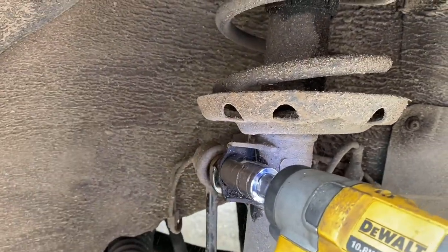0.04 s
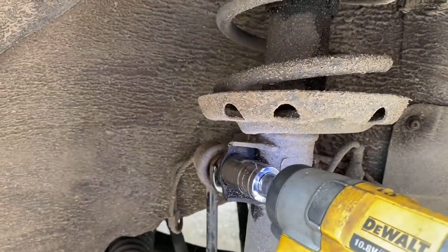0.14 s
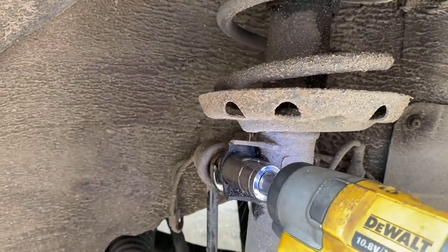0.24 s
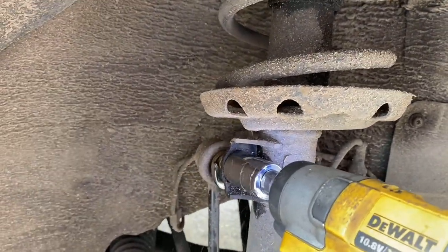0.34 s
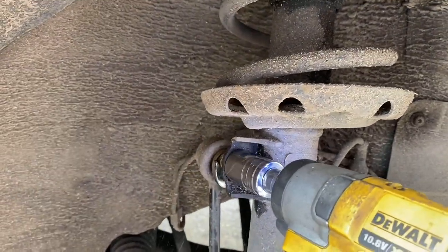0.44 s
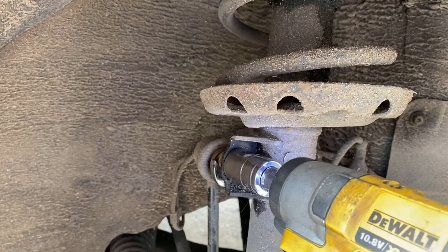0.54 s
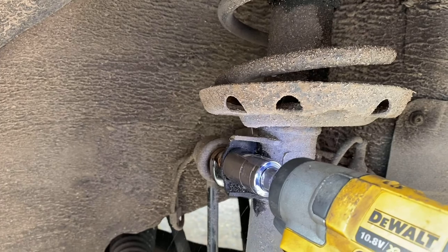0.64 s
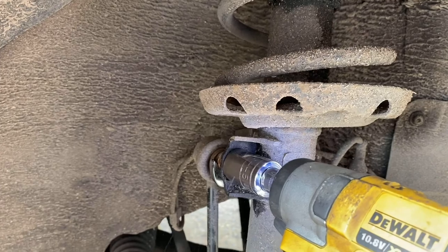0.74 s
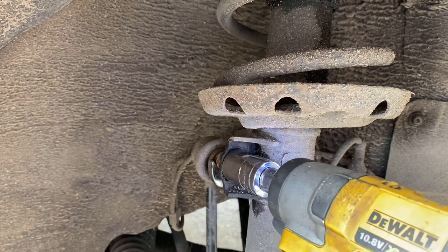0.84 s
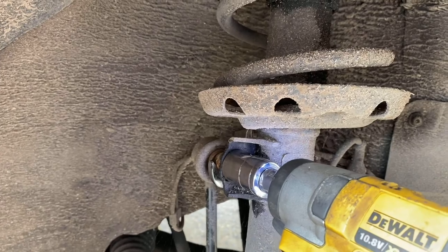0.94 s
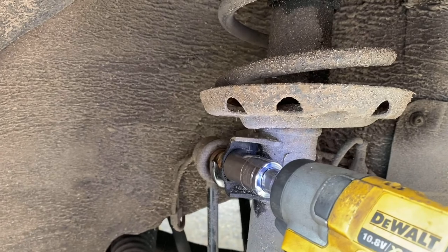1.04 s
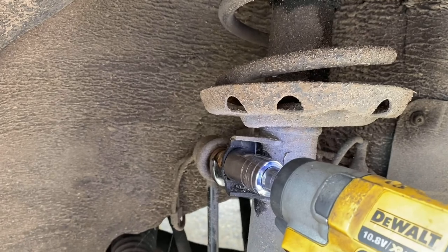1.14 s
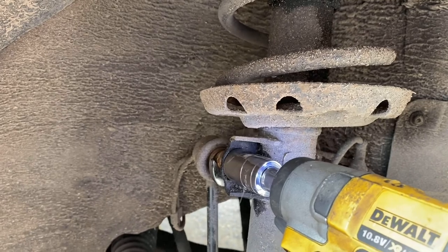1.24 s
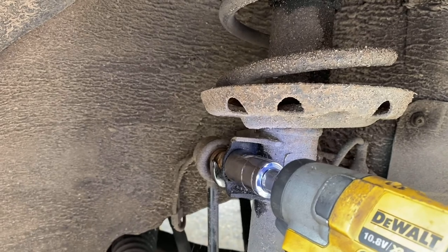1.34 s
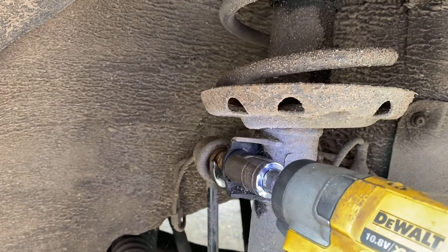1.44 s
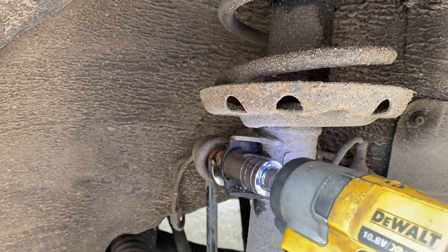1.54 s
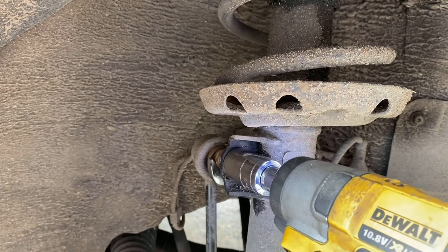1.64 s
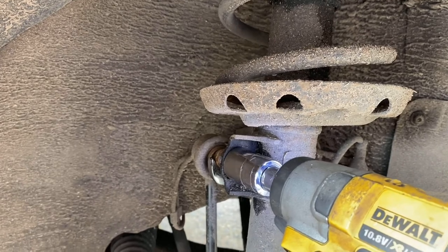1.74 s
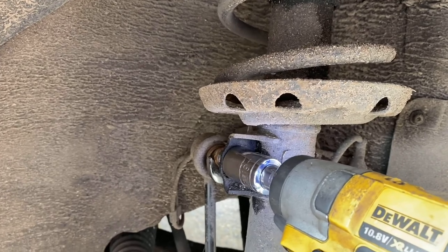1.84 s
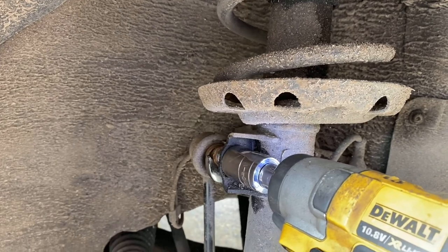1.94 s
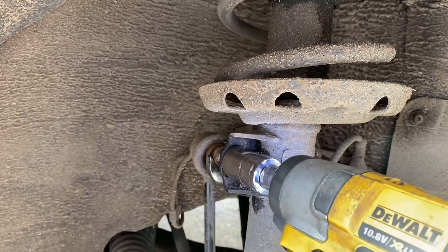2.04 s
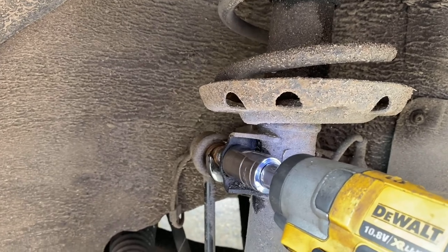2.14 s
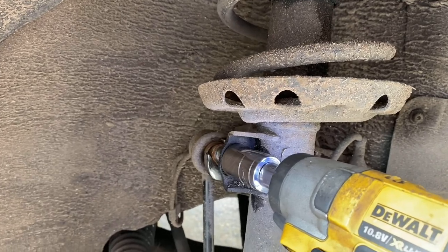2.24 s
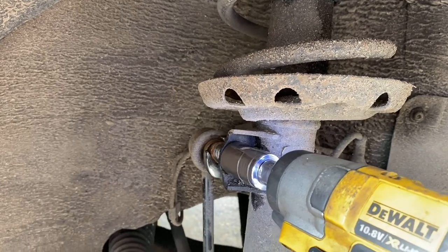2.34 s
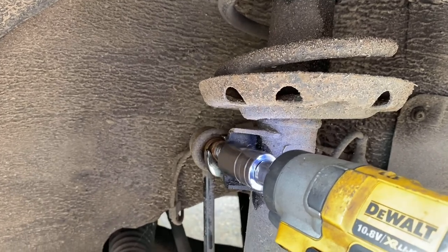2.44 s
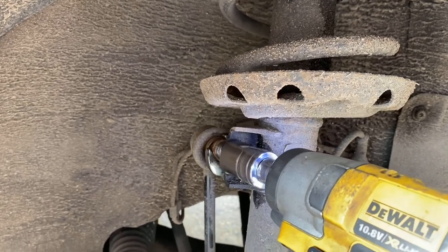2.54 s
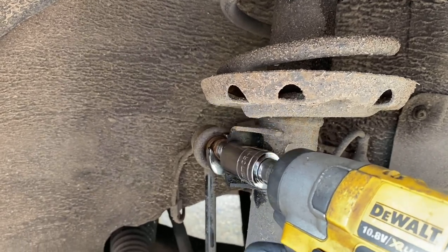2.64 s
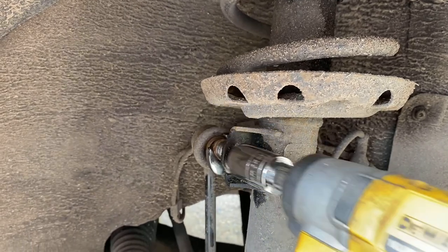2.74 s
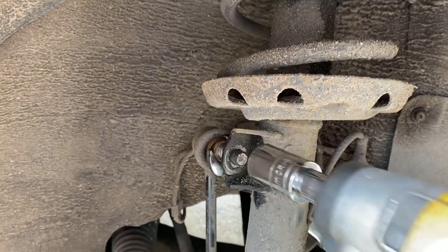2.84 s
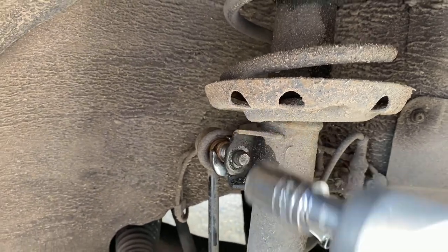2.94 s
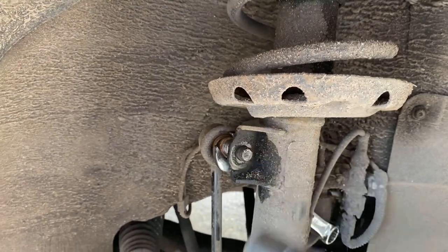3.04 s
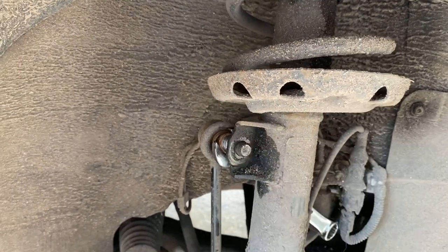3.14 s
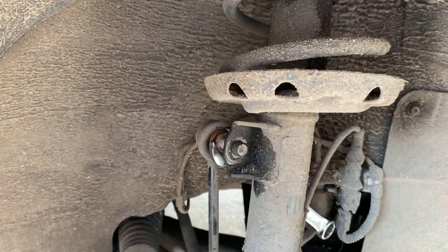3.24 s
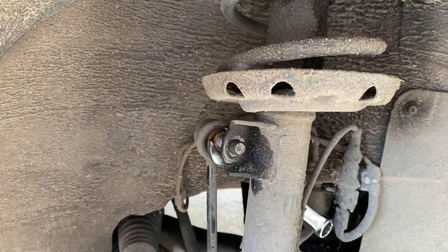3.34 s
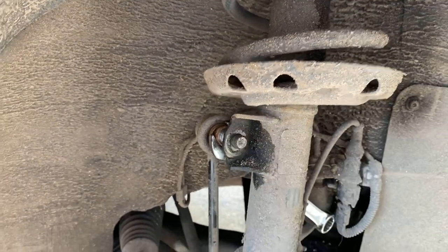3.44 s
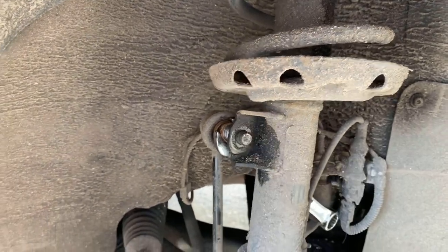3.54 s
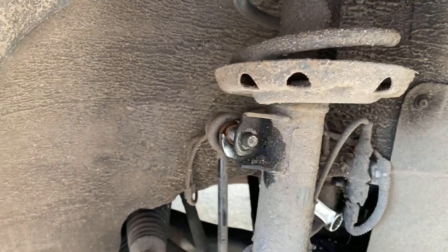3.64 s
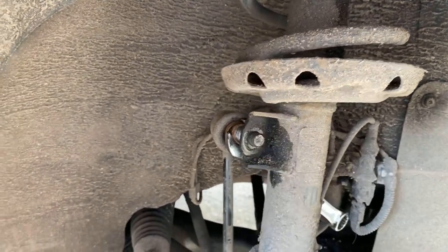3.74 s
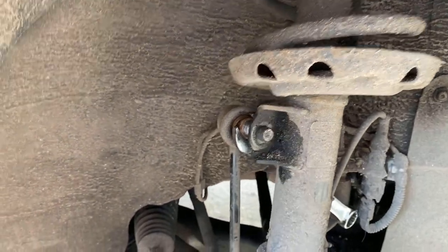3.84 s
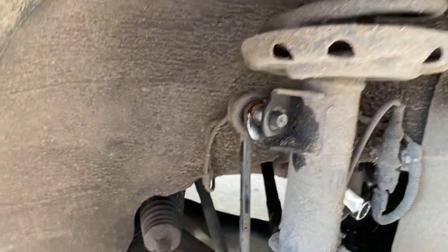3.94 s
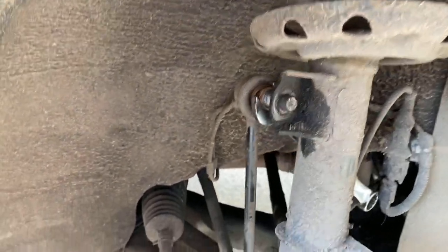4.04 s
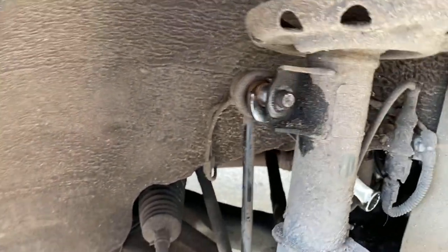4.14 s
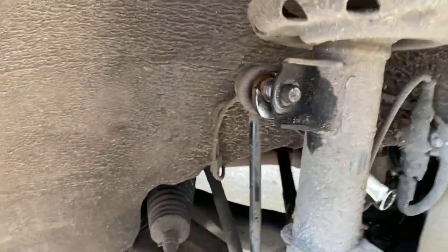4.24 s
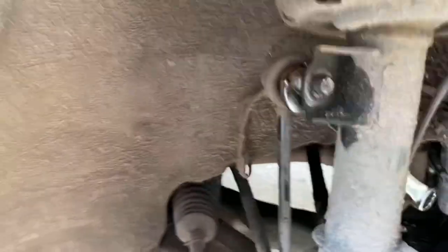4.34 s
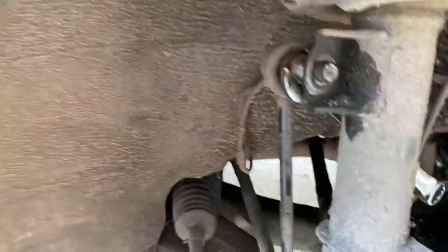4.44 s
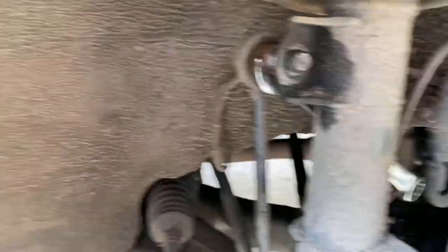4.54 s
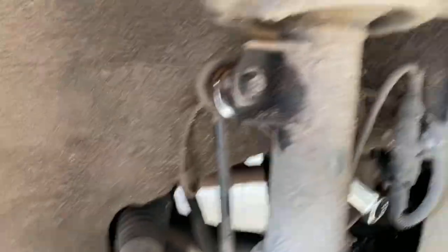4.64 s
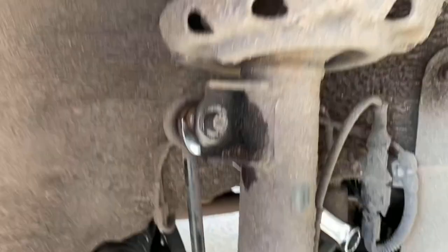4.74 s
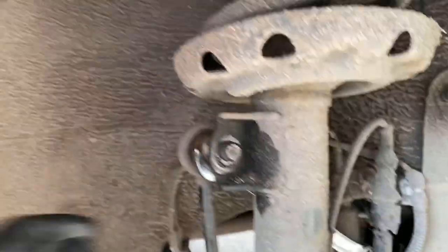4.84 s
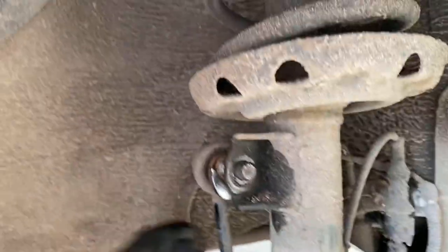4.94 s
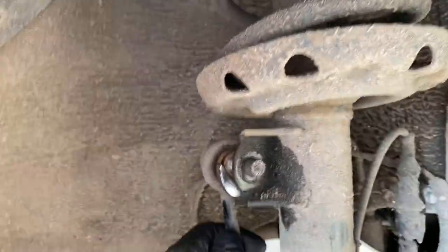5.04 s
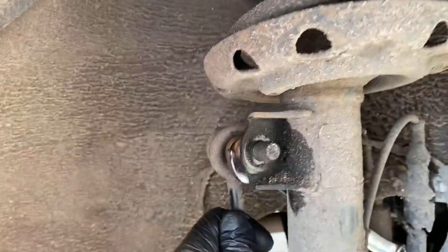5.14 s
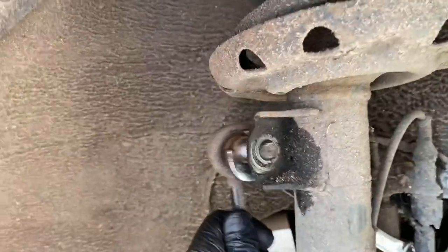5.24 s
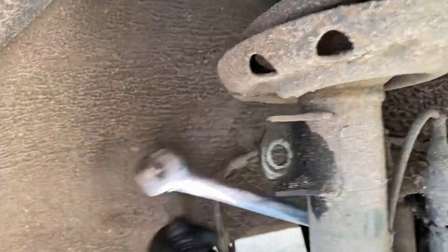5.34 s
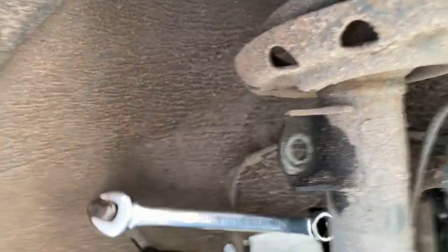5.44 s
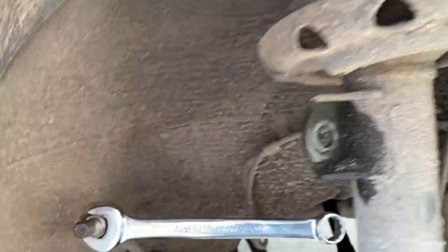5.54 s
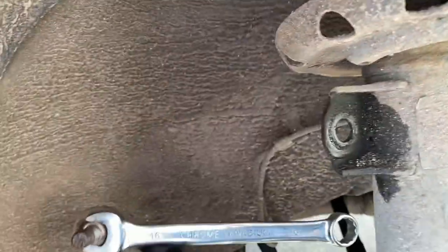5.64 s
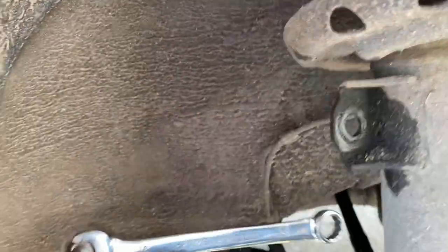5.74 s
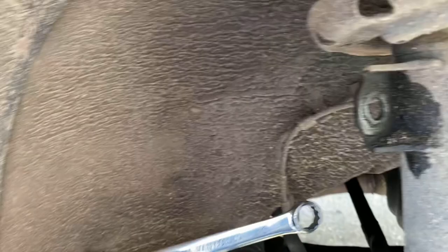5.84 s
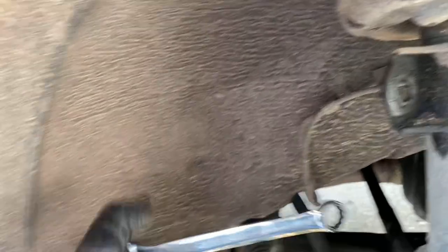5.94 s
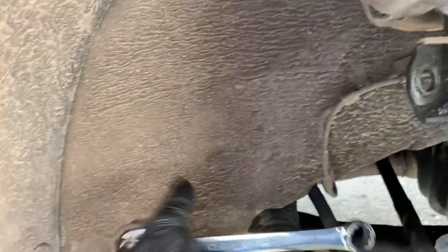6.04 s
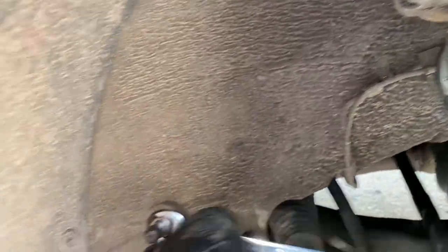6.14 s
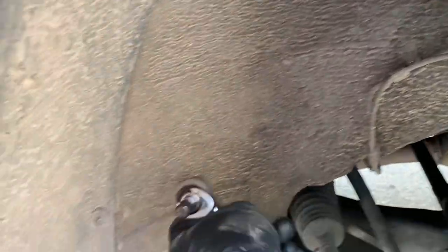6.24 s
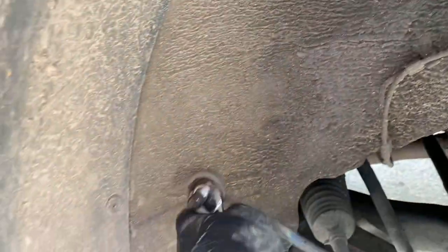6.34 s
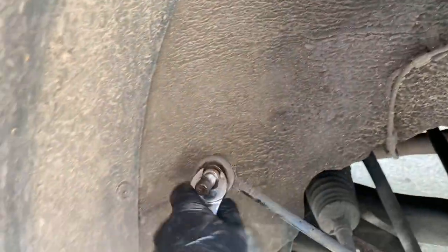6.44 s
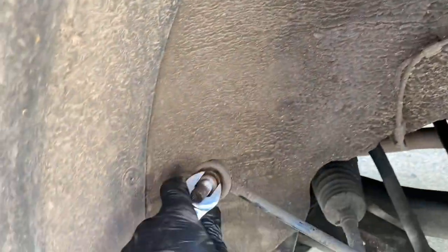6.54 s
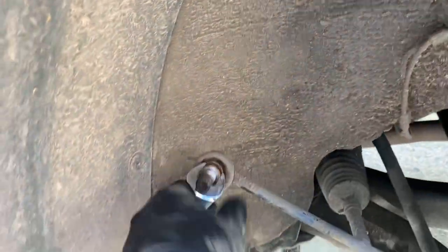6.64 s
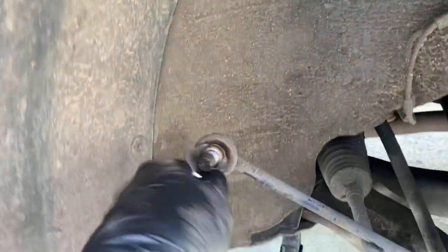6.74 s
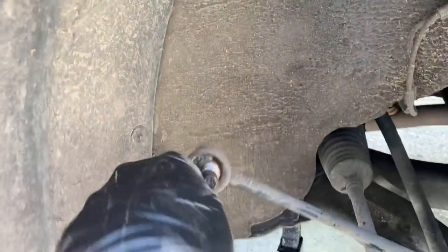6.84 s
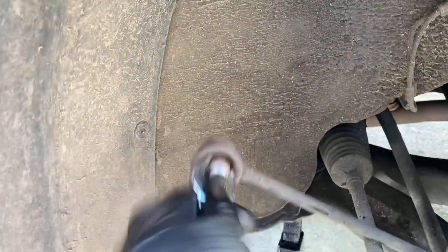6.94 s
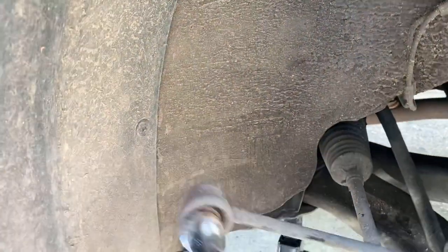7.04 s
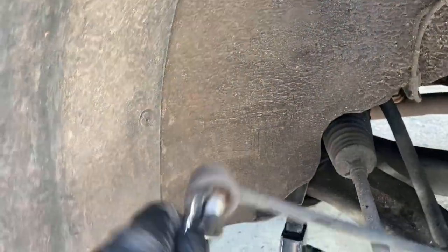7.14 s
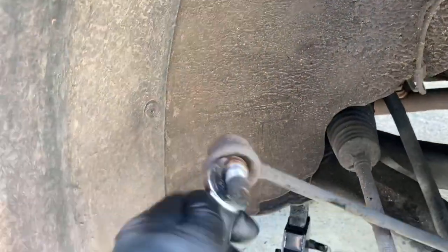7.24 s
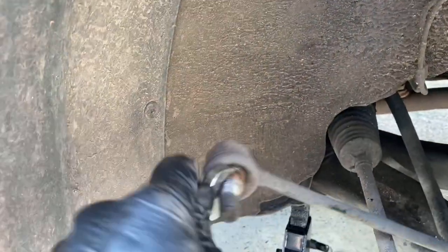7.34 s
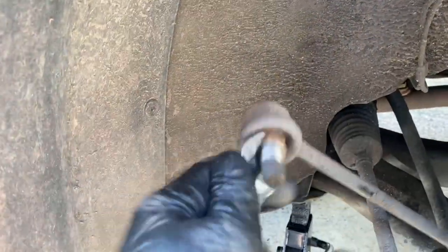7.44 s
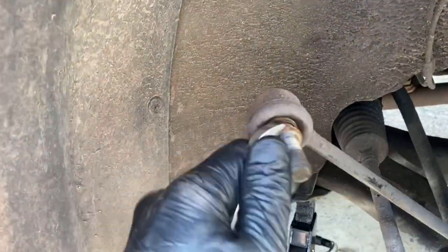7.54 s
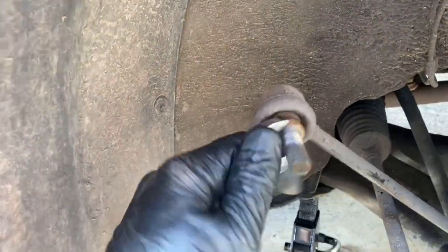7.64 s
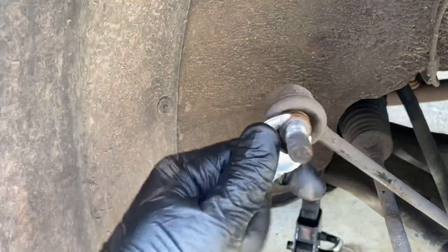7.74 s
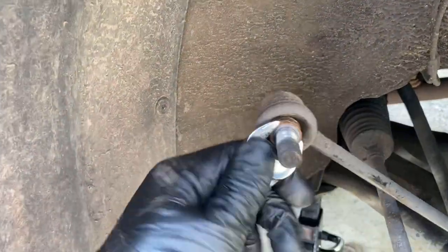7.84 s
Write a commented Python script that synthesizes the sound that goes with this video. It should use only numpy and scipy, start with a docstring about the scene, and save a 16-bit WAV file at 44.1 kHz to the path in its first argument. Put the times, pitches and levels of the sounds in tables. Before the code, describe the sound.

Close up under a car's wheel arch, a cordless impact wrench hammers a nut at about fifty hard steel blows a second, slows, whirs free and stops with a thin clack. The tool is put down with sharp plastic-metal knocks, then a spanner and link tap and scrape. The handheld microphone rumbles over faint traffic and a distant rev.

```python
"""A cordless impact wrench hammers about fifty times a second on a rusty nut at a car's strut, slows, spins
free and stops; then the tool is put down, a spanner and a steel link knock and scrape in a gloved hand,
the hand-held camera rumbles, and far off an engine revs over faint street noise.
Blows and contacts are noise bursts ringing steel resonances; thumps are falling sweeps; motor, rumble,
rustle and traffic are shaped noise; whine, shaft and engine are sine orders of a turning rate."""
import sys
import numpy as np
from scipy import signal
from scipy.fft import rfft, irfft, next_fast_len
from scipy.io import wavfile
from scipy.ndimage import uniform_filter1d, map_coordinates

SR = 44100
rng = np.random.default_rng(int(sys.argv[2]) if len(sys.argv) > 2 else 0)


def convert_level_to_amplitude(level_db):
    """Map a level in decibels to its linear amplitude factor."""
    exponent = np.asarray(level_db, float) / 20
    return 10 ** exponent


def store_pcm(level_fs):
    """Save levels as 16-bit WAV."""
    pcm = np.round(np.clip(level_fs, -1, 1) * 32767).astype(np.int16)
    wavfile.write(sys.argv[1], SR, np.atleast_2d(pcm).T)


N = 347508


def unit(x):
    """Normalisation: scale to rms 1."""
    return x / np.sqrt(np.mean(x ** 2) + 1e-20)


def along(points, hz):
    """Interpolation of (frequency, value) points on a logarithmic frequency axis."""
    f, value = np.transpose(points)
    return np.interp(np.log(hz + 1), np.log(f + 1), value)


def curves(rows):
    """Linear interpolation in time: one value per sample for each column after the time."""
    s, *columns = np.transpose(rows)
    return [np.interp(np.arange(N) / SR, s, column) for column in columns]


def wobble(rate):
    """Random modulation: a smooth curve through `rate` random knots a second."""
    knots = rng.standard_normal(int(N * rate / SR) + 4)
    return map_coordinates(knots, [np.arange(N) * rate / SR])


def filtered(x, response):
    """Linear filtering: the spectrum of x times a complex response of frequency."""
    m = next_fast_len(x.shape[-1] + 4096)
    spectrum = rfft(x, m) * response(np.fft.rfftfreq(m, 1 / SR))
    return irfft(spectrum, m)[..., :x.shape[-1]]


def ringing(modes, hz, flip=-1):
    """Modal superposition of causal resonances; neighbours swing opposite ways if flip is negative."""
    total = 0
    for k, (centre, width, db) in enumerate(modes):
        damping = 1j * hz * width
        total = total + flip ** k * convert_level_to_amplitude(db) * damping / (centre * centre - hz * hz + damping)
    return total


def ports(pair, alike):
    """Stereo coherence: two independent signals, as mid and side, give the wanted left-right likeness."""
    def weights(hz):
        turn = np.arccos(np.clip(along(alike, hz), -1, 1)) / 2
        return np.array([np.cos(turn), np.sin(turn)])

    mid, side = filtered(pair, weights)
    return np.array([mid + side, mid - side])


def rush(response, alike):
    """Spectrally shaped random noise in stereo, of rms 1."""
    return unit(ports(filtered(rng.standard_normal((2, N)), response), alike))


def add(track, s, sound):
    """Superposition: mix a sound in at time s."""
    start = round(s * SR)
    sound = sound[..., max(-start, 0):]
    part = track[..., max(start, 0):][..., :sound.shape[-1]]
    part += sound[..., :part.shape[-1]]


# Diffuse field of street and hand: [f/Hz, left-right likeness]
DIFFUSE_LIKENESS = [(60, 1), (300, 0.21), (640, 0.083), (3000, 0.14)]
# Traffic course: [t/s, level/dB]
TRAFFIC_LEVEL = [(2.6, -83), (4.3, -80), (4.7, -77.5), (6.9, -76.5), (7.88, -71.5)]
# Traffic spectrum: [f/Hz, relative level/dB]
TRAFFIC_SPECTRUM = [(71, -34.5), (120, -6), (236, -9.5), (400, -13.5), (658, -17.5), (1430, -19),
                    (2010, -26), (4000, -41.5), (5200, -53)]
# Revving far engine: [t/s, firing rate f/Hz, third-order level/dB]
ENGINE_REV = [(4.6, 66, -105), (4.801, 71.7, -80), (4.998, 73.7, -75.5), (5.249, 80, -71.5),
              (5.45, 82.1, -71), (5.65, 78.1, -83), (5.95, 74.2, -79.5)]
# Engine orders: [multiple of the firing rate, relative level/dB]
ENGINE_ORDER_LEVELS = [(2, -4), (3, 0), (4, -9), (5, -8)]
# Faint narrow bands: [start t/s, end t/s, start f/Hz, end f/Hz, half-width f/Hz, level/dB]
FAINT_BANDS = [(4.9, 5.806, 397, 397, 30, -74), (7.05, 7.948, 393, 393, 25, -73),
               (7.54, 7.625, 4310, 4240, 45, -90), (7.655, 7.755, 7500, 7300, 550, -70.5),
               (7.66, 7.76, 6200, 6500, 450, -76), (7.7, 7.95, 1580, 1330, 50, -72)]
# Faint bands, thin in the field: [f/Hz, left-right likeness]
FAINT_LIKENESS = [(60, .2)]


def street():
    """Diffuse noise and harmonic orders: far traffic, a revving engine and faint narrow noise bands."""
    traffic_db, = curves(TRAFFIC_LEVEL)
    traffic = rush(lambda f: convert_level_to_amplitude(along(TRAFFIC_SPECTRUM, f)), DIFFUSE_LIKENESS)
    out = convert_level_to_amplitude(traffic_db + 1.0 + 1.2 * wobble(6.2)) * traffic

    fade_in = (4.4, ENGINE_REV[0][1], -110)
    fade_out = (6.1, ENGINE_REV[-1][1], -110)
    rate_hz, engine_db = curves([fade_in, *ENGINE_REV, fade_out])
    turn = 2 * np.pi * np.cumsum(rate_hz) / SR
    for order, order_db in ENGINE_ORDER_LEVELS:
        # each order wavers on its own, and its phase differs between the ports
        level = np.sqrt(2) * convert_level_to_amplitude(engine_db + order_db + 1.5 * wobble(19.0))
        out += level * np.sin(order * turn + rng.normal(0, 0.32, (2, 1)))

    t = np.arange(N) / SR
    for start, end, hz, end_hz, width_hz, level_db in FAINT_BANDS:
        gone = np.clip((t - start) / (end - start), 0, 1)
        swell = np.sin(np.pi * gone) ** .7 * convert_level_to_amplitude(2.5 * wobble(45))
        glide = 2 * np.pi * np.cumsum(hz + (end_hz - hz) * gone) / SR
        # slow noise on a sine and a cosine makes a narrow band around the pitch
        for wave in (np.sin, np.cos):
            slow_noise = rush(lambda f: np.exp(-(f / width_hz) ** 2), FAINT_LIKENESS)
            out += convert_level_to_amplitude(level_db) * swell * slow_noise * wave(glide)
    return out


# Steady rumble of the held camera: [t/s, level/dB]
GRIP_LEVEL = [(2.2, -100), (2.6, -72.5), (3.7, -69.5), (4.29, -79.5), (4.73, -68.5), (5.6, -67.5),
              (6.2, -62.5), (7.2, -68.5), (7.88, -67.5)]
# The camera is shifted: [t/s, level/dB, rise/(dB per s), fall/(dB per s)]
CAMERA_SHOVES = [(2.939, -55, 158, 83.5), (4.81, -68.5, 700, 400), (5.48, -58, 502, 253),
                 (6.241, -51, 700.5, 69), (6.499, -61, 105.5, 123), (6.79, -48.5, 200, 148),
                 (6.95, -54, 132, 58)]
# Rumble spectrum: [f/Hz, relative level/dB]
RUMBLE_SPECTRUM = [(15, -41), (25, -16), (49, 0), (76, 2.5), (135, -8), (300, -21), (400, -58)]
# Glove and sleeve course: [t/s, level/dB]
RUSTLE_LEVEL = [(2.2, -107), (2.94, -95), (3.2, -81.5), (3.7, -92.5), (3.76, -80), (4.29, -89.5),
                (5.44, -85), (5.6, -77.5), (6.23, -81), (6.48, -102), (6.78, -84), (7.63, -82.5),
                (7.88, -75)]
# Rustle spectrum: [f/Hz, relative level/dB]
RUSTLE_SPECTRUM = [(1060, -35.5), (1800, -12.5), (3480, -7.5), (7030, -6), (11500, -11.5)]


def hand():
    """Structure-borne and friction noise: lumpy rumble of the camera body, grainy rustle of glove and sleeve."""
    (grip_db,), (rustle_db,), t = curves(GRIP_LEVEL), curves(RUSTLE_LEVEL), np.arange(N) / SR
    level = convert_level_to_amplitude(grip_db)
    for s, db, rise, fall in CAMERA_SHOVES:
        level = level + convert_level_to_amplitude(db - np.maximum((s - t) * rise, (t - s) * fall))
    rumble = rush(lambda f: convert_level_to_amplitude(along(RUMBLE_SPECTRUM, f)), DIFFUSE_LIKENESS)
    rumble = unit(convert_level_to_amplitude(3 * wobble(27)) * rumble)
    rustle = rush(lambda f: convert_level_to_amplitude(along(RUSTLE_SPECTRUM, f)), DIFFUSE_LIKENESS)
    rustle = unit(convert_level_to_amplitude(2.7 * wobble(44) + 1.2 * wobble(380)) * rustle)
    return level * rumble + convert_level_to_amplitude(rustle_db) * rustle


# Near sources (contacts and wrench): [f/Hz, left-right likeness]
NEAR_LIKENESS = [(60, .93), (250, .92), (500, .76), (1000, .6), (2000, .85), (4000, .5), (8000, .9)]
# Where the hands are: [t/s, left-right level/dB]
HAND_PLACE = [(2.5, 4), (3.8, 3.5), (4.1, -1), (4.6, 6.5), (5.1, 0.5), (5.9, 1.5), (7.9, -3.5)]
# Resonances of the tool's shell: [f/Hz, width f/Hz, level/dB]
TOOL_SHELL = [(2150, 200, -2), (2934, 120, 3), (3570, 150, 1), (4400, 200, 1)]
# Resonances of the tool's plastic case: [f/Hz, width f/Hz, level/dB]
TOOL_CASE = [(300, 120, -4), (745, 80, 4), (1190, 130, 1), (1480, 130, 2), (1900, 110, 0)]
# Spanner resonances: [f/Hz, width f/Hz, level/dB]
SPANNER_MODES = [(2940, 90, -5), (3430, 95, 4), (4168, 70, 4), (4928, 70, 3), (5710, 110, -1),
                 (6150, 120, 4), (7160, 80, 1)]
# Steel link resonances: [f/Hz, width f/Hz, level/dB]
LINK_MODES = [(640, 80, -2), (900, 60, 6), (1120, 110, -4), (1410, 90, -2), (1540, 70, -1), (2080, 90, -3),
              (2700, 130, 1)]
# Wheel-arch panel resonances: [f/Hz, width f/Hz, level/dB]
PANEL_MODES = [(183, 71, 0.5), (258, 107, 2), (425, 270, -5)]


def contact(track, s, push, slow_push, thud_db, edge_db, ring_hz):
    """Modal excitation: a push rings dull parts near ring_hz and a bright edge; the panel booms for longer."""
    tool_down_s = 3.95  # contacts before this are the tool being laid down
    # the edge dulls above top_hz
    if s < tool_down_s:
        top_hz, bright, dull = 15000, TOOL_SHELL, TOOL_CASE
    else:
        top_hz, bright, dull = 7250, SPANNER_MODES, LINK_MODES
    # each contact lands on another spot and wakes the modes differently, by 2 dB
    bright, dull = [[(c, w, g + 2 * rng.standard_normal()) for c, w, g in part] for part in (bright, dull)]
    # a soft contact wakes few modes, a hard one many
    spread = np.interp(edge_db, [-30, 0], [.2, .55])

    def edge(f):
        band = 1 / (1 + (2100 / (f + 1)) ** 4) / (1 + (f / top_hz) ** 3)
        return convert_level_to_amplitude(edge_db - 10.5) * band * (0.56 + 3 * ringing(bright, f, flip=0.96))

    def body(f):
        focus = 1 / (1 + (np.log((f + 1) / ring_hz) / spread) ** 2)
        return (ringing(dull, f) + 0.32) * 1.07 / np.sqrt(spread) * focus

    def thud(f):
        return convert_level_to_amplitude(thud_db + 9.5) * ringing(PANEL_MODES, f) / (1 + (f / 600) ** 4)

    sound = filtered(push, lambda f: edge(f) + body(f)) + filtered(slow_push, thud)
    pan_db = np.interp(s, *np.transpose(HAND_PLACE))
    add(track, s, convert_level_to_amplitude([[pan_db / 2], [-pan_db / 2]]) * ports(sound, NEAR_LIKENESS))


# Small contacts: [t/s, level/dB, relative thud level/dB, relative edge level/dB, strongest ring f/Hz]
KNOCK_EVENTS = [(3.283, -61, -18, -4, 1130), (3.337, -61, -20, 1, 2222), (3.702, -31, -17, 1, 1240),
                (3.781, -25, -40, -5.5, 1010), (3.785, -38, -42, -10, 900), (3.859, -50.5, -17, -2, 1610),
                (3.886, -54, -6.5, -1, 1260), (4.026, -58, -22, -10, 2000), (4.051, -44.5, -13, -12, 646),
                (4.065, -53, -19, -13, 596), (4.154, -57, -26, -2, 713), (4.358, -63, -24, -4, 2400),
                (4.6131, -45.5, -20.5, 4, 4300), (4.64, -46, -15, 7.5, 2400), (5.035, -56.5, -2, 2, 899),
                (5.074, -48.5, -4, -22, 1000), (5.208, -47.5, -21, 18.5, 1490), (5.228, -52, -2, -9, 1540),
                (5.239, -54, -7, -3, 1520), (5.847, -49.5, 3, -31, 864), (6.236, -43, -3.5, -13, 1200),
                (6.527, -52, -1, -32.5, 900), (6.578, -55.5, -2, -18, 2630), (6.609, -54.5, -7, -8, 2680),
                (6.74, -58, -4, -22, 890), (6.753, -48, -5, -9, 2840), (6.949, -61.5, -4, -1, 1010),
                (6.997, -41, -3, -26, 935), (7.387, -56.5, -14, -19, 2600), (7.5, -68.5, 9, 6, 690),
                (7.634, -64, 1, -19, 2760), (7.779, -59.5, 7.5, -23, 500), (7.806, -61, -5, -25, 1500),
                (7.816, -43, -12, -27, 1400)]
# Steel dragged on steel:
# [start t/s, loudest t/s, end t/s, level/dB, relative thud level/dB, relative edge level/dB]
SCRAPE_EVENTS = [(3.749, 3.757, 3.768, -48, -40, -1), (4.57, 4.604, 4.62, -70.5, 8, 0),
                 (5.051, 5.077, 5.115, -53, -5, -6), (5.212, 5.225, 5.265, -49.5, -3, 8)]


def knocks():
    """Impact and friction: sharp taps with a weaker, longer tail from the wheel arch, and ragged scrapes."""
    out, size = np.zeros((2, N)), 8192
    t = np.arange(size) / SR
    seat_s = .0012  # a part takes this long to seat
    for s, db, thud_db, edge_db, hz in KNOCK_EVENTS:
        noise = rng.standard_normal((2, size))
        snap = 1.5 * np.exp(-((t - .0006) / .00003) ** 2) * [[1], [.3]]  # the instant of contact
        tap = convert_level_to_amplitude(db + 5) * (noise * (1 - np.exp(-t / seat_s)) + snap)
        t60 = .038 * 900 / hz  # small bright parts fall silent sooner
        fade = convert_level_to_amplitude(-60 * t / t60) + 0.96 * convert_level_to_amplitude(-60 * t / 0.0015) + convert_level_to_amplitude(-25 - 60 * t / 0.25)
        contact(out, s - .0005, tap * fade, tap * convert_level_to_amplitude(-60 * t / 0.22), thud_db, edge_db, hz)
    for start, top, end, db, thud_db, edge_db in SCRAPE_EVENTS:
        stroke_db = np.interp(t, [0, top - start, end - start, size / SR], [-18.0, -0.5, -25.5, -108])
        roughness_db = 3 * wobble(400)[:size]
        grit = convert_level_to_amplitude(db + 11.0 + stroke_db + roughness_db) * rng.standard_normal((2, size))
        contact(out, start, grit, grit, thud_db, edge_db, ring_hz=1310)
    return out


# Motor labours, runs free, the loose socket rattles, brakes:
# [t/s, motor and gears level/dB, housing rattle relative level/dB]
MOTOR_COURSE = [(0, -43, -1.5), (2.2, -38.5, -3.5), (2.27, -44.5, -7.5), (2.365, -45.5, -14),
                (2.385, -42.5, -5.5), (2.44, -41.5, 2), (2.5, -44.5, -5.5), (2.56, -45, -2),
                (2.61, -52.5, -6.5), (2.645, -80, -17), (2.67, -78, -2), (2.7, -100, -4)]
# Gear noise spectrum: [f/Hz, relative level/dB]
GEAR_SPECTRUM = [(53, -43), (90, -10.5), (155, -10), (300, -10.5), (526, -17.5), (908, -6), (1710, -8),
                 (3080, -11.5), (8210, -8.5)]
# Gear housing resonances: [f/Hz, width f/Hz, level/dB]
HOUSING_MODES = [(940, 40, -2), (1710, 50, 0), (1958, 35, -1), (2215, 50, -3), (3385, 40, -1),
                 (3615, 40, 2), (4960, 60, -1), (5280, 50, -2)]
# Gear whine: steady under the hammering, rising as the nut runs free: [t/s, f/Hz]
WHINE_PITCH = [(2.25, 1565), (2.31, 1655), (2.39, 1680), (2.43, 1765), (2.52, 1740), (2.6, 1690)]
# Orders of the whine: [multiple of the pitch, relative level/dB]
WHINE_ORDER_LEVELS = [(1, -4), (2, -4), (3, 0)]


def motor():
    """Gear-mesh excitation: noise, housing rattle, whine orders and shaft hum; the socket wobbles each turn."""
    t = np.arange(N) / SR
    gear_db, rattle_db = curves(MOTOR_COURSE)
    gears = unit(filtered(rng.standard_normal((2, N)), lambda f: convert_level_to_amplitude(along(GEAR_SPECTRUM, f))))

    def housing(f):
        band = 1 / (1 + (1100 / (f + 1)) ** 4) / (1 + (f / 6000) ** 4)
        return (ringing(HOUSING_MODES, f, flip=0.99) + .3) * band

    ticks = convert_level_to_amplitude(3 * wobble(500)) * rng.standard_normal((2, N))
    rattle = unit(filtered(ticks, housing))
    socket_db = 2.5 * np.cos(2 * np.pi * 38 * (t - 2.432)) + 1.5 * wobble(60)

    whine_hz, = curves(WHINE_PITCH)
    turn = 2 * np.pi * np.cumsum(whine_hz) / SR
    tones = np.zeros(N)
    for order, order_db in WHINE_ORDER_LEVELS:
        tones += convert_level_to_amplitude(-12.5 + order_db + 3 * wobble(40)) * np.sin(order * turn + .9 * wobble(120))
    shaft_hz, shaft_db = 154, -17
    tones += convert_level_to_amplitude(shaft_db + 4 * wobble(25)) * np.sin(2 * np.pi * shaft_hz * t + .4 * wobble(20))
    noise = convert_level_to_amplitude(1.3 * wobble(50)) * gears + convert_level_to_amplitude(rattle_db + socket_db) * rattle
    return convert_level_to_amplitude(gear_db) * (noise + tones * [[1], [0]])  # tones in the mid row alone


# Hammer turning, one blow at each whole number; steady, then faltering as the nut frees:
# [t/s, blows struck]
HAMMER_TURNING = [(-0.003, -1), (0.0178, 0), (0.1196, 5), (0.2586, 12), (0.42, 20), (0.7189, 35),
                  (1.0138, 50), (1.4036, 70), (1.7335, 87), (1.894, 95), (1.9709, 99), (2.0145, 101),
                  (2.0606, 103), (2.0828, 104), (2.1025, 105), (2.1458, 107), (2.1718, 108), (2.2038, 109),
                  (2.2278, 110)]
# A usual blow: [t/s, steel level/dB, thump level/dB]
BLOW_FORCE = [(0, -11.5, -37.5), (1.152, -12, -39), (1.5, -13, -38.5), (1.9, -11.5, -38.5),
              (2.063, -12, -41), (2.1022, -13.5, -36.5), (2.14, -10, -43.5), (2.249, -12.5, -38.5)]
# Blows that jolt the whole strut: [t/s, thump level/dB]
STRUT_JOLTS = [(0.018, -23.5), (0.099, -24.5), (0.18, -28.5), (0.219, -29.5), (0.258, -27.5), (0.278, -29),
               (0.6, -27), (0.619, -18), (0.639, -21.5), (0.68, -30), (0.7, -27), (0.798, -26),
               (0.916, -26), (0.975, -30), (1.033, -24), (1.072, -25.5), (1.111, -29), (1.131, -25.5),
               (1.229, -30), (1.501, -29.5), (1.617, -28.5), (1.694, -29.5), (1.874, -30), (2.172, -30)]
# The last clack as the shaft stops: one row [t/s, steel level/dB, thump level/dB]
BRAKE_CLACK = (2.583, -23, -62)


def blow_rows():
    """Quasi-periodic impact train: (s, steel dB, thump dB) of scattered blows, strut jolts, then the brake."""
    s, struck = np.transpose(HAMMER_TURNING)
    chance = rng.standard_normal((round(struck[-1] - struck[0]) + 1, 3))
    jitter_s, steel_scatter_db, thump_scatter_db = .0004, 1.1, 4.5
    times = np.interp(struck[0] + np.arange(len(chance)), struck, s) + jitter_s * chance[:, 0]
    at, steel_db, thump_db = np.transpose(BLOW_FORCE)
    steel_db = np.interp(times, at, steel_db) + steel_scatter_db * chance[:, 1]
    thump_db = np.interp(times, at, thump_db) + thump_scatter_db * chance[:, 2]
    for jolt_s, jolt_db in STRUT_JOLTS:
        thump_db[np.argmin(abs(times - jolt_s))] = jolt_db
    return np.vstack([np.transpose([times, steel_db, thump_db]), BRAKE_CLACK])


# Decay of a blow in the wheel arch: [f/Hz, T60 t/s]
ARCH_DECAY = [(500, 0.14), (2000, 0.07), (6000, 0.056), (15000, 0.031)]


def blow_tails(count, size):
    """Frequency-dependent decay: noise bursts dying faster in the treble, each coloured in its own way."""
    hz, frame, z = signal.stft(rng.standard_normal((count, 2, size)), SR, nperseg=64)
    colour_db = uniform_filter1d(rng.standard_normal((count, 1, len(hz), 1)), size=3, axis=2)
    colour_db = 1.3 * unit(colour_db)
    colour_db[-1, 0, :, 0] = np.minimum(hz, 9500) / 1100  # the last clack is thin and bright
    decay_db = -60 * frame / along(ARCH_DECAY, hz)[:, None]
    tails = signal.istft(z * convert_level_to_amplitude(colour_db + decay_db), SR, nperseg=64)[1][..., :size]
    ticks = np.repeat(rng.standard_normal((count, 1, size // 16)), 16, axis=2)
    tails = tails * convert_level_to_amplitude(1.5 * ticks)  # steel chatters in tiny ticks
    strength = np.linalg.norm(tails, axis=(1, 2), keepdims=True)
    return tails * strength.mean() / strength  # colour varies, strength is the blow's own


# Socket and strut resonances: [f/Hz, width f/Hz, level/dB]
STRUT_MODES = [(926, 35, -3), (1130, 60, -4), (1391, 50, -3), (1543, 35, -4), (1899, 45, -4),
               (2271, 55, -1), (2581, 60, 2), (3010, 70, -4), (3284, 60, -4), (3815, 80, 5), (4550, 95, 0),
               (5000, 150, -4), (6225, 100, -3)]
# Colour of a blow: [f/Hz, relative level/dB]
BLOW_COLOUR = [(240, -30.5), (400, -10.5), (734, -7.5), (1370, 0), (1750, 0), (2220, -1), (2800, -1),
               (4000, 0), (8190, -1.5), (11000, -3)]


def hammer():
    """Impact and bending-wave dispersion: chatter ringing the strut, and a thump that falls in pitch."""
    steel, thumps, size = np.zeros((2, N)), np.zeros((2, N)), 2048
    blows, t = blow_rows(), np.arange(size) / SR
    tails = blow_tails(len(blows), size)
    ring_scatter_db, detune = 2.5, .002  # detune as a share of the pitch
    for k, ((s, db, thump_db), tail) in enumerate(zip(blows, tails)):
        lag, size_db, bend, twist = rng.random(4)
        strike = (1 - np.exp(-t / .0005)) * (1 + 2.2 * convert_level_to_amplitude(-60 * t / .008))
        # the socket rattles on the nut a few milliseconds later
        rebound = convert_level_to_amplitude(-10.0 + 1.6 * size_db) * np.exp(-((t - .002 - 0.0039 * lag) / 0.0033) ** 2)
        woken = rng.standard_normal((len(STRUT_MODES), 2))
        rung = [(c * (1 + detune * a), w, g + ring_scatter_db * b)
                for (c, w, g), (a, b) in zip(STRUT_MODES, woken)]
        burst = convert_level_to_amplitude(db - 7.5) * (strike + rebound) * tail
        add(steel, s - .0004, filtered(burst, lambda f: 1 + 1.3 * ringing(rung, f, flip=0.96)))
        # bending waves spread out: the highs arrive first, pitch falls as 1 / time
        turns = (1.25 + 0.4 * (bend - .5)) * np.log(1 + t / .0011)
        sweep = np.sin(2 * np.pi * turns) * convert_level_to_amplitude(-60 * t / 0.11) * (1 - np.exp(-t / 0.00067))
        # the anvil's two lugs push opposite ways
        push = (-1) ** k * convert_level_to_amplitude(thump_db + 6.5)
        add(thumps, s + 0.00097, push * sweep * [[1], [3 * twist - 1.5]])
    thumps = filtered(thumps, lambda f: 1 / (1 + (32 / (f + 1)) ** 4))
    return filtered(steel, lambda f: convert_level_to_amplitude(along(BLOW_COLOUR, f))) + thumps


# Wrench level at the left port over the right: [f/Hz, level/dB]
WRENCH_LEFT_LEVEL = [(60, 1), (180, -1), (550, 4.5), (1650, 1.5), (4970, 3.5), (15000, -0.5)]
# Wrench phase by which the left port leads: [f/Hz, phase/rad]
WRENCH_LEFT_LEAD = [(0, -0.5), (520, 0.5), (1550, 1.16), (2070, 6.5), (3360, 7.5), (5510, 6.5), (6030, 4.5),
                    (7150, 8.5), (8010, 5), (11600, -2.5), (12600, 6), (13800, -4), (15500, -5),
                    (16700, -12)]


def scene():
    """Level and phase differences: the wrench reaches the two ports by different paths around the camera."""
    side = np.array([[.5], [-.5]])

    def paths(f):
        return convert_level_to_amplitude(side * along(WRENCH_LEFT_LEVEL, f)) * np.exp(1j * side * along(WRENCH_LEFT_LEAD, f))

    wrench = filtered(ports(hammer() + motor(), NEAR_LIKENESS), paths)
    return street() + hand() + knocks() + wrench


def band_limit(x):
    """A steep low-pass at the top of the band."""
    return signal.sosfilt(signal.butter(12, 17120, fs=SR, output="sos"), x)


# Response of the microphone ports: [f/Hz, level/dB]
MICROPHONE_RESPONSE = [(7600, 1), (8300, -1), (9000, 4), (12300, 2), (13300, -11), (14300, 3.5),
                       (15300, 10.5), (16000, -4), (16500, -20.5), (17100, -69.5)]


def record(dry):
    """Transducer response: the microphone ports have a notch and a peak in the top octave."""
    mix = filtered(dry, lambda f: convert_level_to_amplitude(along(MICROPHONE_RESPONSE, f)))
    return band_limit(mix)


dry = scene()
out = record(dry)
store_pcm(out)
```